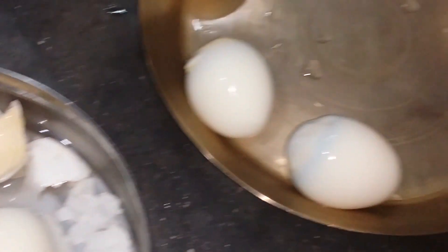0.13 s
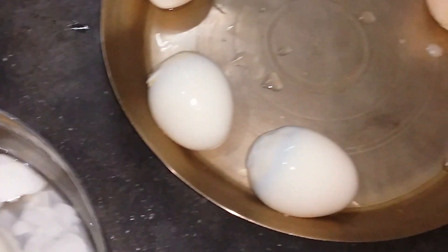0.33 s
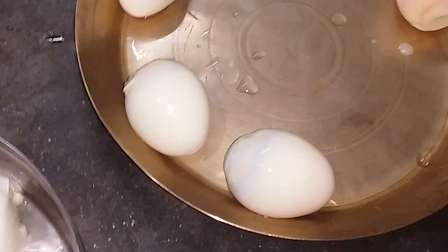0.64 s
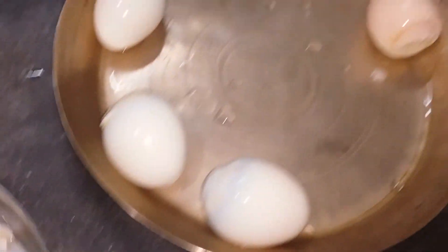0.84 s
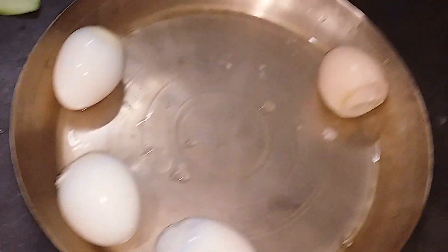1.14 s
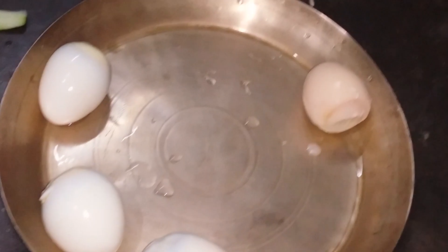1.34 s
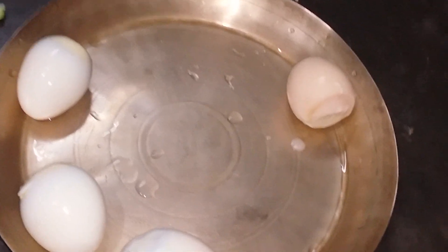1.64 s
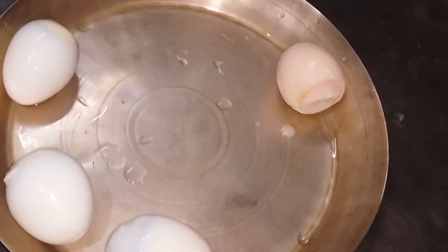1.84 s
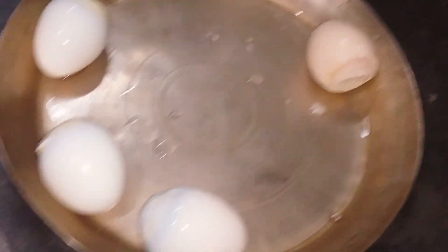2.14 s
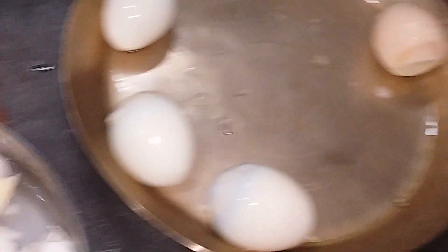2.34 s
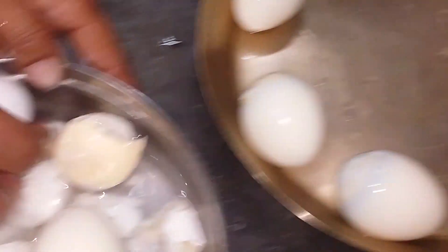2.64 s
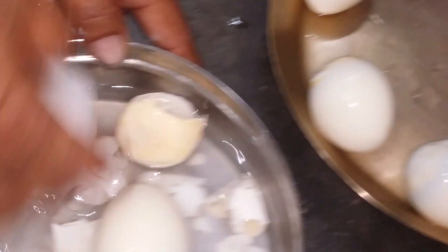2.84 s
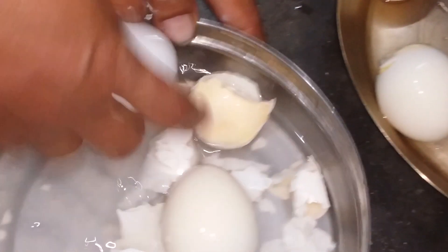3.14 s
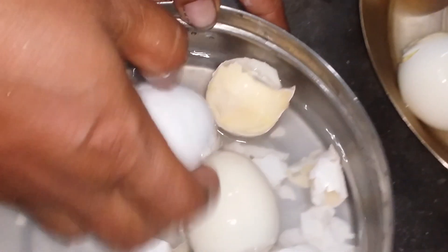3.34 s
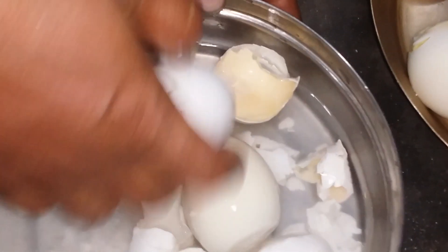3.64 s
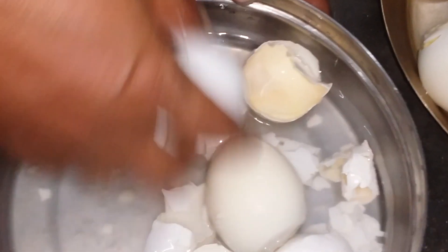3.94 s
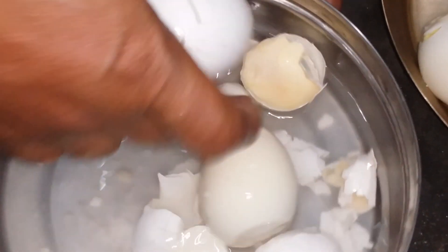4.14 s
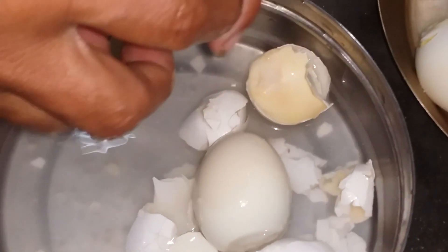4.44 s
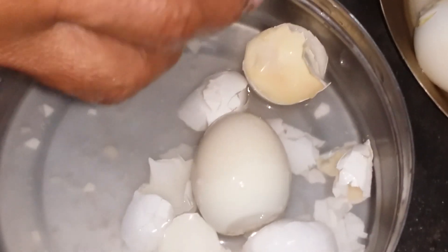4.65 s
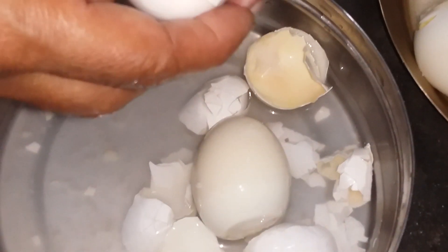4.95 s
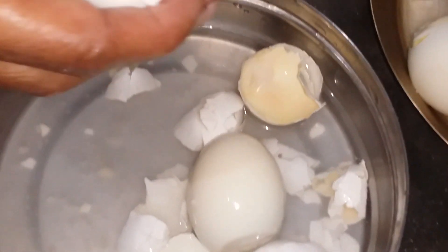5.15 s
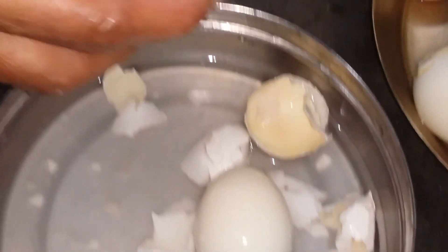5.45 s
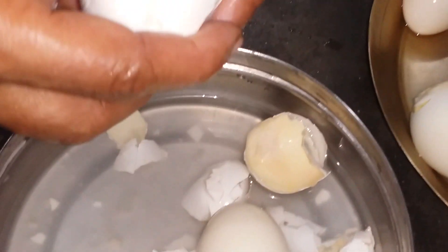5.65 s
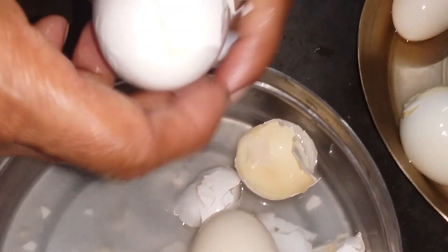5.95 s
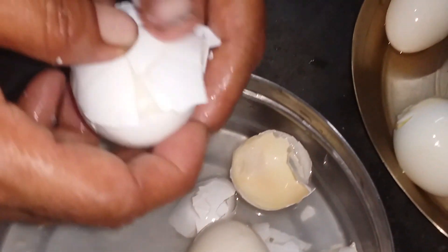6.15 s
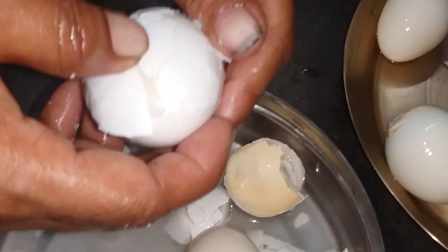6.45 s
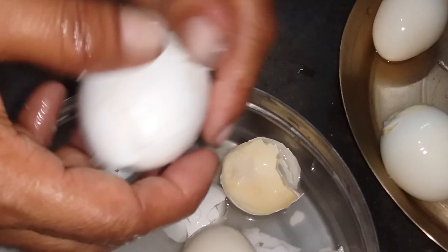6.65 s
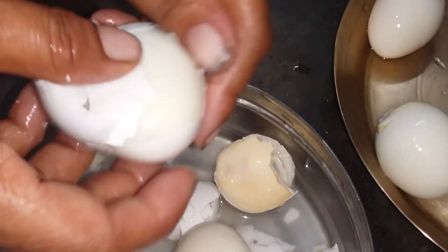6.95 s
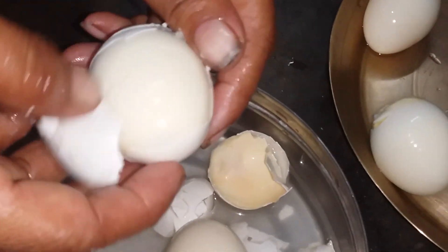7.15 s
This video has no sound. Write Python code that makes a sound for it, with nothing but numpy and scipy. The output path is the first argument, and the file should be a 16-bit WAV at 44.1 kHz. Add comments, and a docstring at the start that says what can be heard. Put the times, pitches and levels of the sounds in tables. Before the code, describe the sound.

Sharp knocks of a boiled egg cracking against a ringing bowl, after brief wet shell rummaging, then close crisp snaps and tearing as shell is peeled.

```python
"""A steady room rush, a dull tick and a light tap, then a hand rummages among wet shell pieces in a bowl.
A boiled egg is knocked on the bowl: bursts of fractures crush the shell and ring the bowl's modes.
From about 4.4 s the shell is picked off close by: single snaps, and tears made of dense tiny fractures.
A thin hiss swells once, mostly on the right. Loud peaks push the recorder's gain down. As the camera is
moved, the right microphone port starts muffled, opens by 1.7 s, then grows more muffled than before."""
import sys
import numpy as np
from scipy import signal
from scipy.fft import rfft, irfft
from scipy.io import wavfile
from scipy.ndimage import uniform_filter1d

SR = 44100
rng = np.random.default_rng(int(sys.argv[2]) if len(sys.argv) > 2 else 0)


def store_wav(level_fs):
    """Save 16-bit WAV to argv[1]."""
    pcm = np.round(np.clip(np.atleast_2d(level_fs), -1, 1) * 32767)
    wavfile.write(sys.argv[1], SR, pcm.T.astype(np.int16))


N = 322371
TIME = np.arange(N) / SR

# edges of the knock bands thud, clack, ring, crack, fizz: edge_hz
TAP_EDGES_HZ = [450, 1300, 2700, 5500, 10500, 16000]
# colour of breaking shell: freq_hz, relative_level_db
SHELL_COLOUR = [(100, -42), (400, -11), (1500, -3), (3200, -0.5), (4400, 7), (5000, 4.5), (5900, 1.5),
                (7800, 12), (9500, 1.5), (11200, -2.5), (13300, 10), (16000, 1)]
# egg turned in the fingers, crackling faintly between tears: start_s, length_s, relative_level_db
TURNING = (4.9, 2.42, -57)


def amp(db):
    """Decibels to gain."""
    return 10 ** (np.asarray(db) / 20)


def unit(x):
    """Scales to rms 1."""
    return x / np.sqrt(np.mean(x ** 2) + 1e-20)


def curve(rows, t=TIME):
    """Interpolates rows of (s, value) at times t."""
    return np.interp(t, *np.transpose(rows))


def read(points, hz):
    """Interpolates rows of (Hz, value) on a log-frequency axis."""
    f, value = np.transpose(points)
    return np.interp(np.log(hz + 1), np.log(f + 1), value)


def add(mix, s, sound):
    """Mixes a sound in at time s."""
    part = mix[..., round(s * SR):][..., :sound.shape[-1]]
    part += sound[..., :part.shape[-1]]


def tint(x, points):
    """Gives a steady sound a spectrum."""
    gain = amp(read(points, np.fft.rfftfreq(N, 1 / SR)))
    return irfft(rfft(x) * gain, N)


def click(points, tilt_db=0, size=1024):
    """Causal minimum-phase click of energy 1, its spectrum tilted in dB per octave above 5 kHz."""
    hz = abs(np.fft.fftfreq(size, 1 / SR))
    level_db = read(points, hz) + tilt_db * np.log2(np.maximum(hz / 5000, 1))
    log_gain = np.log(amp(level_db))
    pulse = np.fft.ifft(np.exp(np.conj(signal.hilbert(log_gain)))).real
    return pulse / np.linalg.norm(pulse)


def band(x, low_hz, high_hz):
    """Causal band-pass."""
    sos = signal.butter(3, [low_hz, min(high_hz, .49 * SR)], "band", fs=SR, output="sos")
    return signal.sosfilt(sos, x)


def grains(count, per_s, spread_db):
    """Tiny fractures at random moments and signs, their size set by their rarity; rms 1."""
    chance = rng.random(count) * SR / per_s
    hit = chance < 1
    out = np.zeros(count)
    rarity = np.minimum(-np.log(chance[hit]), 4)
    out[hit] = amp(spread_db * rarity)
    return unit(np.copysign(out, rng.random(count) - .5))


def resonate(x, hz, width_hz):
    """A steep-sided resonance (applied twice); rms 1."""
    b, a = signal.iirpeak(hz, hz / width_hz, SR)
    once = signal.lfilter(b, a, x)
    return unit(signal.lfilter(b, a, once))


def chip(hz, cycles, size=400):
    """A small piece of shell rings for a few cycles; energy 1."""
    turns = hz * np.arange(size) / SR
    ring = np.sin(2 * np.pi * turns) * (1 - np.exp(-turns)) * np.exp(-turns / cycles)
    return ring / np.linalg.norm(ring)


def crackle(per_s, spread_db, cycles, clump_db, count=20):
    """Chips of many sizes, each sounding at its own random moments, all in shared clumps; rms 1."""
    pitches_hz = np.linspace(1500, 16000, count) * rng.normal(1, .03, count)
    chips = np.zeros(N)
    for hz in pitches_hz:
        moments = grains(N, per_s / count, spread_db)
        chips += signal.oaconvolve(moments, chip(hz, cycles))[:N]
    clumps = unit(signal.oaconvolve(rng.standard_normal(N), np.hanning(300), "same"))
    return unit(chips * amp(clump_db * np.clip(clumps, -2, 2)))


def strokes(rows, rise_s, fall_s):
    """Gain of finger strokes: each takes hold, keeps its strength, then dies away."""
    out = np.zeros(N)
    for s, length_s, db in rows:
        rise = np.clip((TIME - s) / rise_s + .5, 0, 1)
        out += amp(db) * rise * np.exp(-np.clip((TIME - s - length_s) / fall_s, 0, 20))
    return out


def rush(room_db=-41, waver_db=1.57, hiss_db=-47, hiss_left_db=-11, hiss_peak_s=1.6, hiss_width_s=.55):
    """Wavering coloured room noise, alike at both ports in the bass, plus a thin hiss that swells once."""
    # room rush: freq_hz, relative_level_db
    rush_colour = [(25, -42), (40, -28), (60, 2.5), (130, 1.5), (210, -1.5), (300, -8.5), (370, -5),
                   (500, -10.5), (650, -7), (1000, -11.5), (1600, -13.5), (4000, -25.5), (6400, -24),
                   (7900, -34), (9300, -27.5), (11200, -53), (15500, -37.5)]
    # likeness of the two ports: freq_hz, correlation_0_to_1
    rush_same = [(120, 0.95), (300, 0.7), (700, 0.1), (2000, 0.06), (8000, 0)]
    # hiss: freq_hz, relative_level_db
    hiss_colour = [(1500, -45.5), (4000, -6.5), (5800, 7), (6900, 10), (8200, -15), (11000, -27)]
    a, b = rfft(rng.standard_normal((2, N)))
    same = np.clip(read(rush_same, np.fft.rfftfreq(N, 1 / SR)), 0, 1)
    pair = irfft(np.array([a, same * a + np.sqrt(1 - same ** 2) * b]), N)
    waver = unit(uniform_filter1d(rng.standard_normal(N), size=3000))
    room = unit(tint(pair, rush_colour)) * amp(room_db + waver_db * waver)
    swell = np.exp(-((TIME - hiss_peak_s) / hiss_width_s) ** 2)
    hiss = unit(tint(rng.standard_normal((2, N)), hiss_colour)) * amp(hiss_db) * swell
    return room + hiss * amp([[hiss_left_db], [0]])


def ticks(hz=1100, decay_s=0.00058, size=256):
    """Dull clicks from the grip reach both ports through the camera body: short decaying sines."""
    # start_s, level_db (before decay)
    tick_rows = [(0.1982, -22.5), (1.147, -27)]
    out, t = np.zeros(N), np.arange(size) / SR
    for s, db in tick_rows:
        add(out, s, amp(db) * np.sin(2 * np.pi * hz * t) * np.exp(-t / decay_s))
    return out


def thump(hz=155, gain_db=-18.5, swell_s=0.022, body_db=-22.5, body_s=0.019, size=8192):
    """The counter under the bowl answers a knock with a dull bump and a few slow cycles."""
    t = np.arange(size) / SR
    swell = t / swell_s * np.exp(-t / swell_s)
    sway = swell * np.sin(2 * np.pi * hz * rng.normal(1, 0.054) * t)
    bump = unit(band(rng.standard_normal(size), 130, 720)) * np.exp(-t / body_s)
    return amp(gain_db) * sway + amp(body_db) * bump


def knock(crush_s, levels_db, damping, contact_db=-4, crack_db=-3, crack_s=0.0027,
          spray_db=-11, spray_s=0.0075, size=8192):
    """The shell gives way in a few ms of fractures, which crack in the air and ring the bowl; one port."""
    # bowl modes: freq_hz, relative_level_db, undamped_t60_s (damping scales it)
    bowl_modes = [(670, -13.5, 0.076), (1040, -11.5, 0.0055), (1740, 8.5, 0.036), (1760, 1, 0.012),
                  (2315, 1.5, 0.031), (3013, -2.5, 0.061), (3680, 7.5, 0.033), (3880, 6.5, 0.035),
                  (4374, -1, 0.048), (4710, -4, 0.061), (5010, -4.5, 0.056), (6500, -8.5, 0.013),
                  (7480, -0.5, 0.018), (8140, -2.5, 0.022), (8970, -10.5, 0.022), (9030, -0.5, 0.0148),
                  (10500, -20, 0.017), (13500, -0.5, 0.0071), (15000, -7.5, .004)]
    t = np.arange(size) / SR
    crush = (1 - np.exp(-t / .0003)) * np.exp(-(t / crush_s) ** 4)
    force = grains(size, per_s=7000, spread_db=-0.5) * crush
    force[0] = amp(contact_db) * np.linalg.norm(force)  # the first contact is one sharp blow
    ring = np.zeros(size)
    for hz, db, t60_s in bowl_modes:
        turns = hz * rng.normal(1, .006) * t
        ring += amp(db - 60 * t / (t60_s * damping)) * np.sin(2 * np.pi * (turns + rng.random()))
    crack = 2 * amp(crack_db) * rng.standard_normal(size) * np.exp(-t / crack_s)
    blow = signal.fftconvolve(force, ring + crack)[:size]
    first = t < .015
    # the crack keeps scattering between bowl, hand and counter
    spray = amp(spray_db) * rng.standard_normal(size) * np.exp(-t / spray_s)
    blow = blow / blow[first].std() + spray
    # the spot that is struck sets each band's level over the first 15 ms
    parts = [band(blow, low, high) for low, high in zip(TAP_EDGES_HZ, TAP_EDGES_HZ[1:])]
    return sum(amp(db) * part / part[first].std() for db, part in zip(levels_db, parts))


def taps(gain_db=-3, lag_s=.0004):
    """Knocks and rebounds, coloured by how the egg lands, later at the right port; counter bumps at both."""
    # start_s, crush_s, relative_level_db, tilt_db_per_octave, clink (0 crushing knock - 1 clean clink)
    tap_rows = [(.2357, 0.0052, -21.5, 1, 0.62), (0.687, 0.0025, -36.5, -6, 1),
                (0.798, 0.0015, -38, 2, 0.69), (1.3878, 0.0071, -11.5, 1.1, 0.05),
                (1.474, 0.0041, -35, 3, 0), (1.683, 0.0055, -7.5, -0.5, 0.031),
                (1.9793, 0.0062, -8, 1.8, 0.043), (2.054, 0.049, -30, 0.5, 0),
                (2.259, 0.0028, -8.5, -2, 0.19), (2.5484, 0.0075, -10, 0.5, 0),
                (2.8273, 0.0047, -9, 0.5, 0), (2.838, .0022, -25, -6, 1), (2.856, 0.0025, -18, 4.5, 0.05),
                (3.109, 0.0031, -10.5, 1.7, .05), (3.376, 0.0049, -7.5, 0.3, 0.18),
                (3.444, 0.0067, -32.5, 6.5, 0.15), (3.665, 0.0038, -11, 1, 0.39),
                (3.949, 0.0078, -12, 0.2, 0.068)]
    # levels of the five bands: relative_level_db
    knock_db = np.array([-15, -3, -1.5, 0.5, -7])
    clink_db = np.array([-24.5, -31.5, -0.5, -12, -25])
    # a hand takes hold of the rim and damps the bowl: time_s, t60_factor
    held = [(2.3, 0.9), (2.6, 0.54)]
    # a stiff shell bumps the counter more than a cracked one: time_s, bump_db
    stiffness = [(1.4, 6), (2, -2.5)]
    out = np.zeros((2, N))
    octaves = np.log2(np.array(TAP_EDGES_HZ[1:]) / TAP_EDGES_HZ[3])
    for s, crush_s, db, tilt_db, clink in tap_rows:
        levels_db = db + tilt_db * octaves + (1 - clink) * knock_db + clink * clink_db
        damping = curve(held, s)
        add(out[0], s, knock(crush_s, levels_db, damping))
        add(out[1], s + lag_s, knock(crush_s, levels_db, damping))
        add(out, s, amp(db + curve(stiffness, s)) * (1 - clink) * thump())
    return amp(gain_db) * out


def rummage(gain_db=-4, scrape_db=-3, rise_s=0.014, fall_s=0.029):
    """A wet fizz of shell pieces sliding, and resonant scrapes where an edge of shell catches."""
    # fingers sweep through the pieces: start_s, length_s, relative_level_db
    sweeps = [(.25, 0.054, -40), (.335, .21, -35), (.59, 0.015, -31), (.8, 0.051, -47.5),
              (1.04, 0.054, -42.5)]
    # faint stirring while the hand is in the bowl: start_s, length_s, relative_level_db
    stirring = (0.33, 4.2, -53)
    # colour of the sliding: freq_hz, relative_level_db
    wet_colour = [(80, -39.5), (300, -19.5), (1500, -7), (3000, -9), (5000, -0.5), (7000, 0), (9300, 0.5),
                  (11200, -12), (13500, -2), (16000, -10.5)]
    # start_s, length_s, relative_level_db, freq_hz, width_hz
    scrapes = [(.266, 0.0044, -23, 8450, 5000), (0.46, 0.0034, -16, 5340, 1290),
               (0.475, 0.025, -26, 3600, 1500), (0.502, 0.0067, -20.5, 4100, 2010),
               (0.51, 0.049, -36, 2310, 1810), (.61, 0.014, -24.5, 5150, 1800),
               (0.65, 0.0093, -24.5, 6360, 6130), (5.962, 0.0054, -21, 5960, 1416),
               (5.97, 0.01, -33, 6050, 1300)]
    fizz = crackle(per_s=5600, spread_db=3.0, cycles=5, clump_db=3)
    fizz *= amp(gain_db) * strokes(sweeps + [stirring], rise_s, fall_s)
    out = signal.oaconvolve(fizz, click(wet_colour))[:N]
    for s, length_s, db, hz, width_hz in scrapes:
        t = np.arange(0, 4 * length_s, 1 / SR)
        slips = resonate(grains(len(t), per_s=9500, spread_db=5.5), hz, width_hz)
        add(out, s, amp(db + scrape_db) * slips * np.exp(-(t / length_s) ** 2))
    return out


def kitchen(x, onset_s=.007, turn_hz=130, count=3, size=16384):
    """Dense reflections from counter and walls, each band dying at its own speed."""
    # freq_hz, t60_s
    room_decay = [(400, 0.25), (1500, 0.17), (4000, 0.23), (9000, 0.17), (15000, 0.18)]
    out = np.zeros((2, N))
    late = np.arange(size) / SR > onset_s
    for k in range(count):
        echoes = rng.standard_normal((2, size)) * (rng.random((2, size)) < .1) * late
        hz, t, z = signal.stft(echoes, SR, nperseg=128)
        decay = amp(-60 * t / read(room_decay, hz)[:, None])
        tail = signal.istft(z * decay, SR, nperseg=128)[1]
        tail /= np.linalg.norm(tail, axis=1, keepdims=True)
        # the sound is handed steadily round several echo paths, so successive moments reach the room by
        # different echoes
        share = np.sqrt(2 / count) * np.cos(2 * np.pi * turn_hz * TIME + np.pi * k / count)
        out += signal.oaconvolve(x * share, tail, axes=1)[:, :N]
    return out


def crumbs(db=-34, spread_db=4, tilt_spread_db=8, count=24):
    """Small fragments break off at random while the egg is turned: start_s, relative dB, tilt dB/octave."""
    start_s, length_s, _ = TURNING
    rows = []
    for k, (when, loud, bright) in enumerate(rng.random((count, 3))):
        s = start_s + length_s * (k + when) / count
        rows.append((s, db + spread_db * (2 * loud - 1), tilt_spread_db * (2 * bright - 1)))
    return rows


def snaps(gain_db=14, splinter_db=2, splinter_s=0.0061, ring_db=-3, cycles=6, size=400):
    """Each fragment breaks in a short run of splinters and rings at two random pitches."""
    # larger fragments: start_s, relative_level_db, tilt_db_per_octave
    snap_rows = [(4.372, -32, 1), (4.792, -28.5, 0), (5.007, -24, -5), (5.081, -28, -10),
                 (5.106, -18.5, -4), (5.138, -26.5, -1), (5.2013, -15.5, 7), (5.284, -19.5, -3.5),
                 (5.3216, -22, -13), (5.334, -10.5, 21), (5.356, -19, 13), (5.4307, -21, 10),
                 (5.442, -22, 11), (5.45, -12.5, -4.5), (5.4936, -26, 2), (5.5088, -22.5, -6),
                 (5.6568, -24, -4), (5.667, -10, 8), (5.802, -26.5, 0), (5.9616, -21, -3), (5.98, -20.5, 1),
                 (6.0266, -21.5, -17), (6.251, -19, -1), (6.267, -20.5, 1.5), (6.543, -23, -18),
                 (6.7092, -29.5, -23), (6.793, -24.5, -12), (6.9532, -37, -2), (6.9658, -26, -7),
                 (7.149, -25.5, -4), (7.157, -14, 20), (7.169, -24, 4), (7.213, -22.5, 10),
                 (7.3008, -14.5, 12)]
    out, t = np.zeros(N), np.arange(size) / SR
    for s, db, tilt_db in snap_rows + crumbs():
        splinters = rng.standard_normal(size) * np.exp(-(t / splinter_s) ** 2)
        force = amp(splinter_db) * splinters / np.linalg.norm(splinters)
        low_ring = chip(rng.uniform(4000, 6500), cycles)
        high_ring = chip(rng.uniform(7000, 15000), cycles)
        force += amp(ring_db) * (low_ring + high_ring)
        snap = np.convolve(force, click(SHELL_COLOUR, tilt_db))
        add(out, s, amp(db + gain_db) * snap / np.linalg.norm(snap))
    return out


def peeling(gain_db=-4, curl_db=2, curl_hz=4650, curl_width_hz=1350, rise_s=0.016, fall_s=0.0083):
    """Shell and membrane tear in a dense run of tiny fractures; some ring the curved piece being lifted."""
    # the thumb tears a strip away: start_s, length_s, relative_level_db
    tears = [(5.28, 0.052, -41.5), (5.445, 0.048, -38.5), (5.585, 0.089, -32), (5.79, 0.074, -53),
             (5.962, 0.021, -39.5), (6.025, 0.062, -47), (6.205, 0.097, -43.5), (6.355, 0.079, -41),
             (6.56, 0.03, -50), (6.79, 0.17, -40), (7.095, 0.075, -46.5), (7.15, 0.063, -42),
             (7.285, .03, -30)]
    fractures = crackle(per_s=3600, spread_db=1.5, cycles=19.0, clump_db=5.5)
    curl = resonate(grains(N, per_s=530, spread_db=6.0), curl_hz, curl_width_hz)
    tearing = signal.oaconvolve(fractures, click(SHELL_COLOUR))[:N] + amp(curl_db) * curl
    return tearing * amp(gain_db) * strokes(tears + [TURNING], rise_s, fall_s)


def gain_control(x, loud_db=-18, depth_db=8.5, fall_s=0.61, hold_s=0.26, recover_db_per_s=6.0, size=512):
    """Loud peaks ease the gain down, until hold_s after the last one; then it creeps back."""
    power = uniform_filter1d((x ** 2).max(0), size)[::size]
    t, step_s = TIME[::size], size / SR
    cut_db, loud_s, cuts_db = 0, -np.inf, []
    for s, loud in zip(t, power > amp(loud_db) ** 2):
        loud_s = s if loud else loud_s
        if s - loud_s < hold_s:
            cut_db += (depth_db - cut_db) * step_s / fall_s
        else:
            cut_db = max(cut_db - recover_db_per_s * step_s, 0)
        cuts_db.append(cut_db)
    return x * amp(-np.interp(TIME, t, cuts_db))


def scene(tap_room_db=-8, peel_room_db=-13, rummage_room_db=-6, peel_right_db=-6, rummage_right_db=-4):
    """Peeling and rummaging lie to the left; knocks, shell and wet pieces feed the room."""
    knocks = taps()
    shell = (peeling() + snaps()) * amp([[0], [peel_right_db]])
    wet = rummage() * amp([[0], [rummage_right_db]])
    room = kitchen(amp(tap_room_db) * knocks + amp(peel_room_db) * shell + amp(rummage_room_db) * wet)
    return knocks + shell + wet + room + ticks() + rush()


def record(dry, open_hz=9000, shut_hz=750, leak_db=-23.5, self_noise_db=-74, cutoff_hz=16300):
    """Covering the right port lowers its treble corner to a leak; then gain, self-noise, clip, band limit."""
    # cover of the right port: time_s, cover (0 open - 1 shut)
    cover = [(0, 0.62), (.7, 0.64), (1.2, 0.29), (1.7, 0.016), (2.26, 0.26), (2.55, 0.42), (2.83, 0.58),
             (3.1, 0.79), (4.4, 0.95)]
    # its own response: freq_hz, gain_db
    right_port = [(100, -2.5), (400, -2.5), (1200, -3.5), (3800, 2.5), (7500, 0), (10000, -21.5),
                  (15000, -5.5)]
    hz, t, z = signal.stft(dry[1], SR, nperseg=256)
    corner_hz = open_hz * (shut_hz / open_hz) ** curve(cover, t)
    passed = np.sqrt(1 / (1 + (hz[:, None] / corner_hz) ** 5) + amp(leak_db) ** 2)
    response = amp(read(right_port, hz))[:, None]
    right = signal.istft(z * passed * response, SR, nperseg=256)[1][:N]
    ports = gain_control(np.array([dry[0], right]))
    ports += amp(self_noise_db) * rng.standard_normal((2, N))
    low_pass = signal.firwin(255, cutoff_hz, window=("kaiser", 9), fs=SR)
    return signal.oaconvolve(np.clip(ports, -1, 1), low_pass[None], "same")


dry = scene()
out = record(dry)
store_wav(out)
```